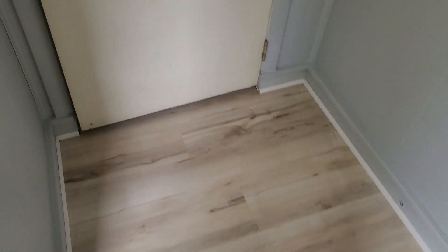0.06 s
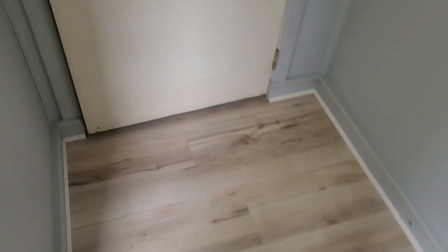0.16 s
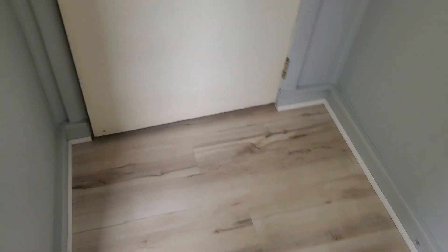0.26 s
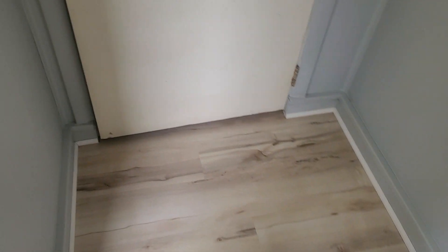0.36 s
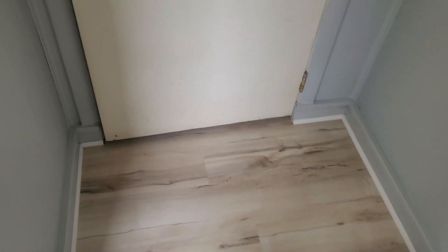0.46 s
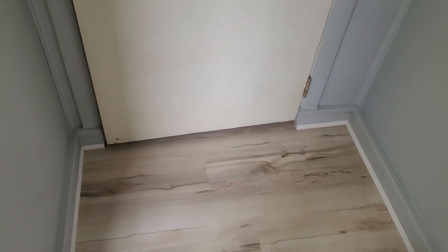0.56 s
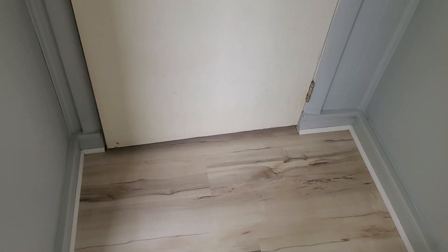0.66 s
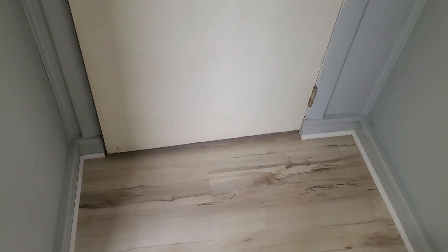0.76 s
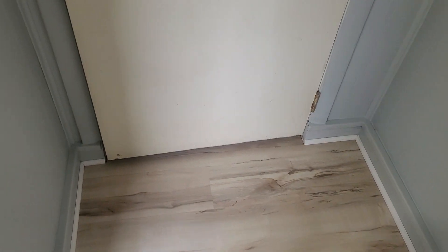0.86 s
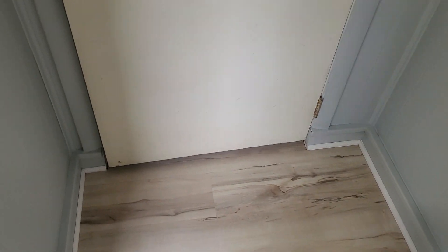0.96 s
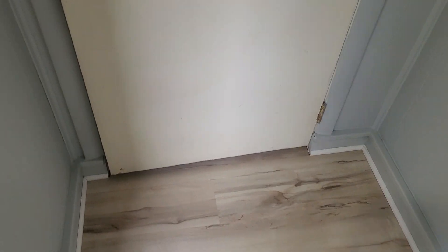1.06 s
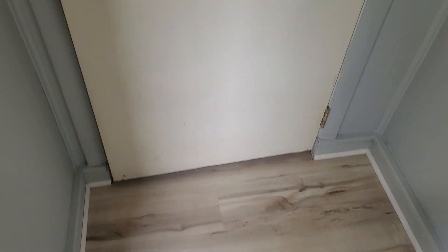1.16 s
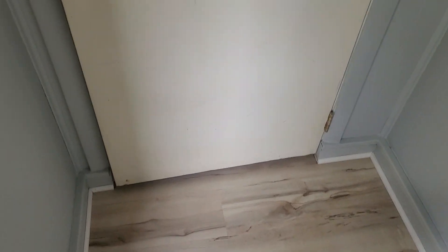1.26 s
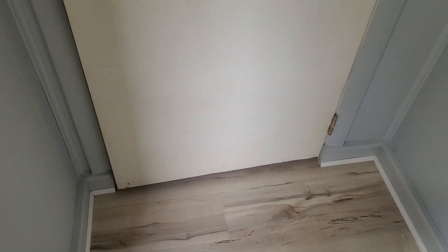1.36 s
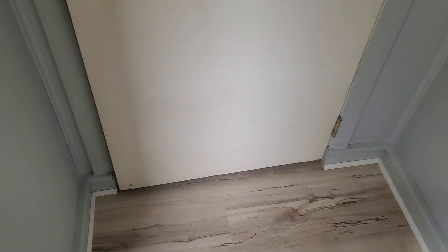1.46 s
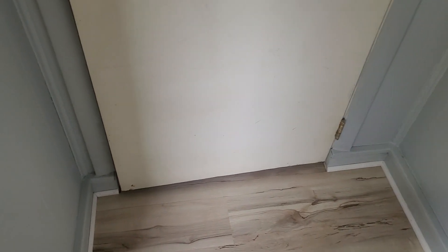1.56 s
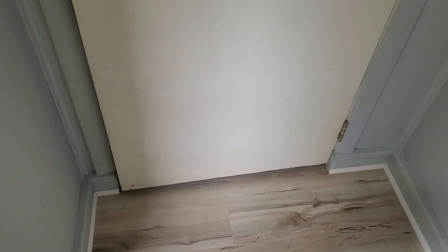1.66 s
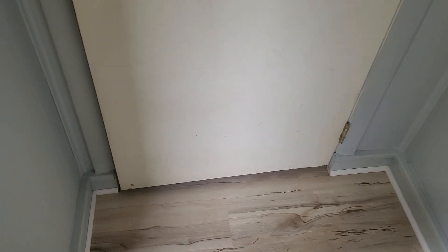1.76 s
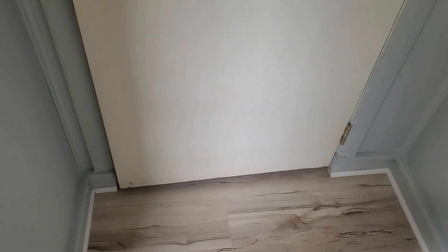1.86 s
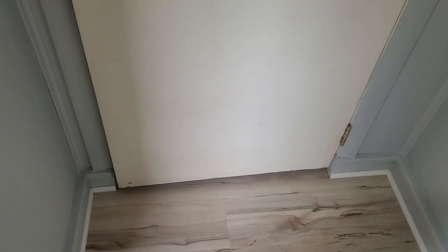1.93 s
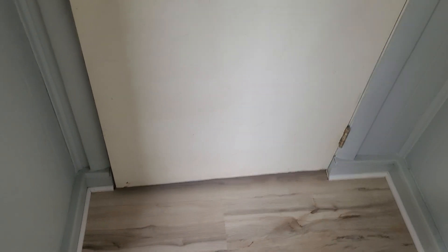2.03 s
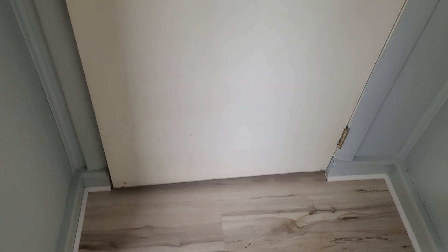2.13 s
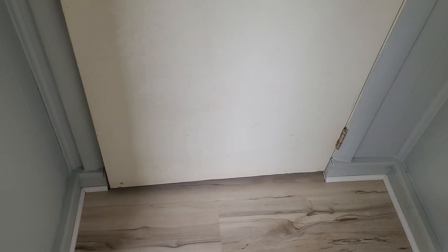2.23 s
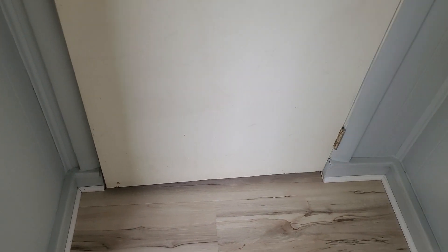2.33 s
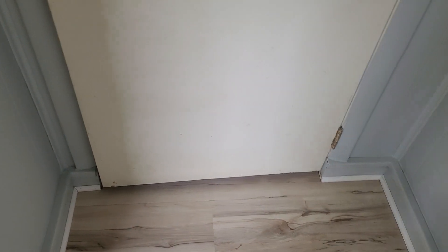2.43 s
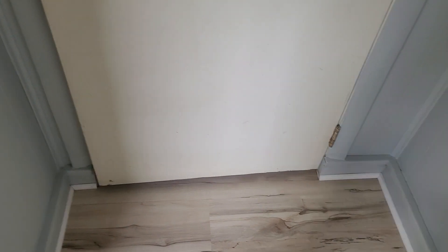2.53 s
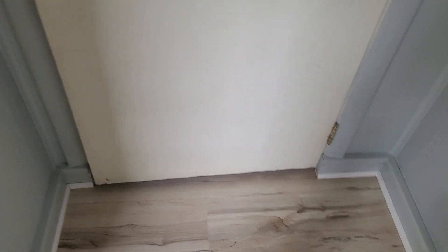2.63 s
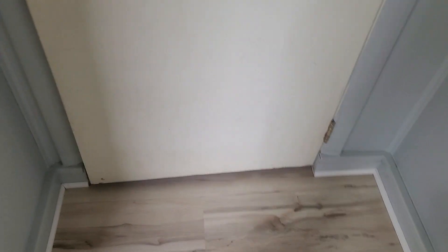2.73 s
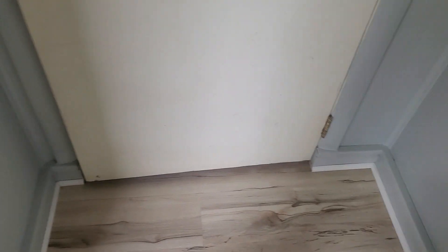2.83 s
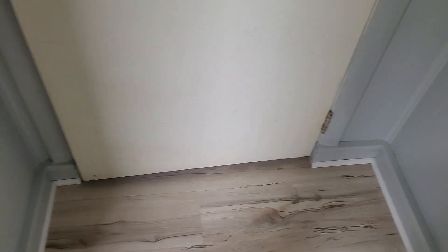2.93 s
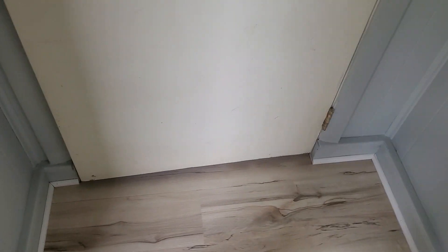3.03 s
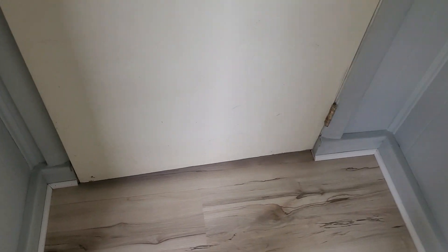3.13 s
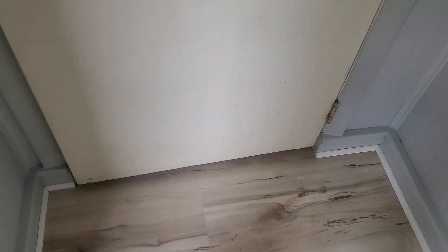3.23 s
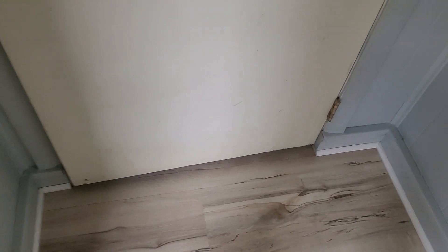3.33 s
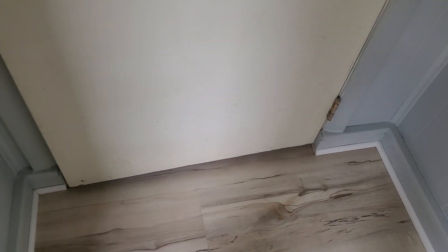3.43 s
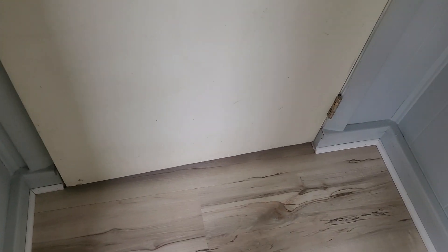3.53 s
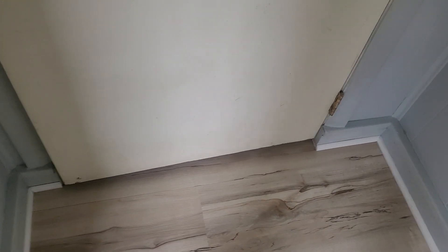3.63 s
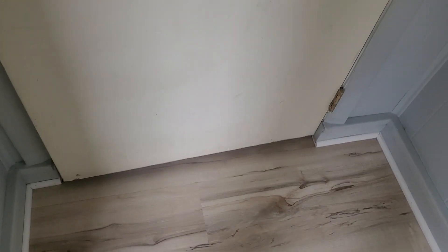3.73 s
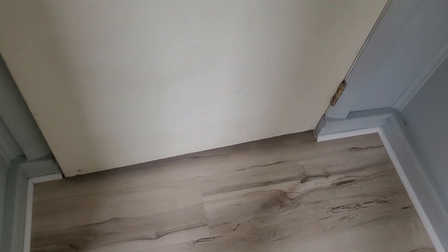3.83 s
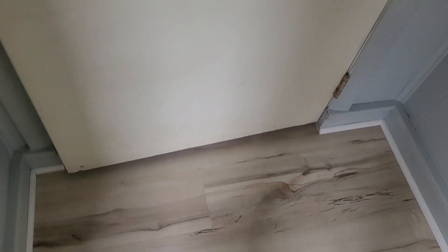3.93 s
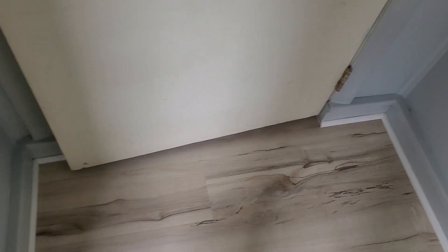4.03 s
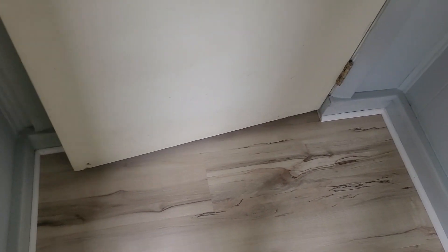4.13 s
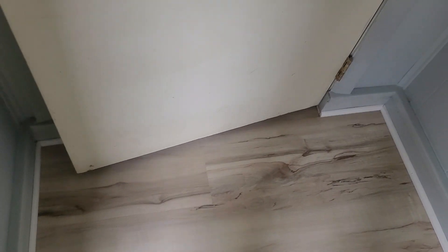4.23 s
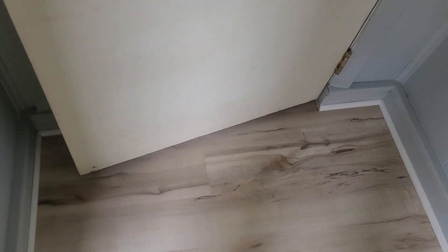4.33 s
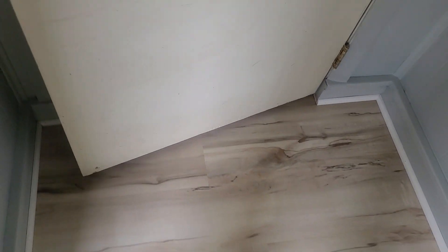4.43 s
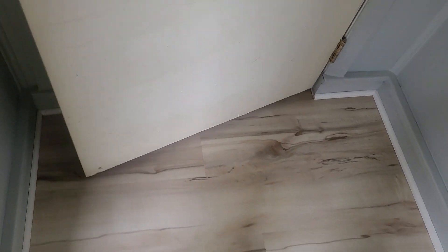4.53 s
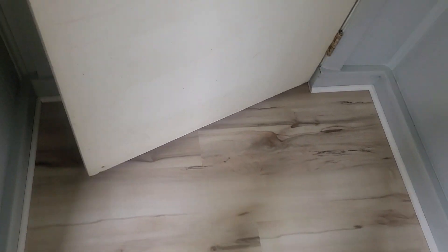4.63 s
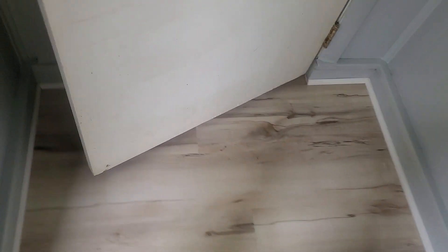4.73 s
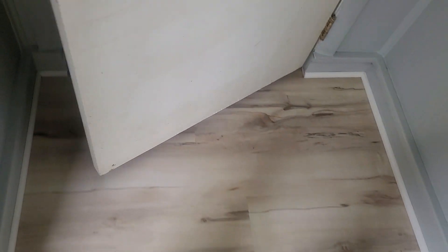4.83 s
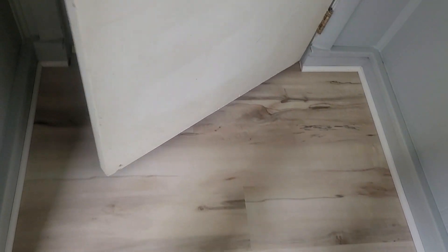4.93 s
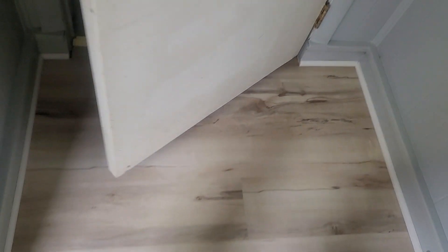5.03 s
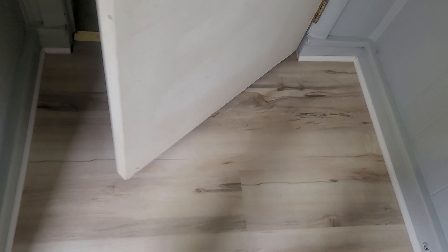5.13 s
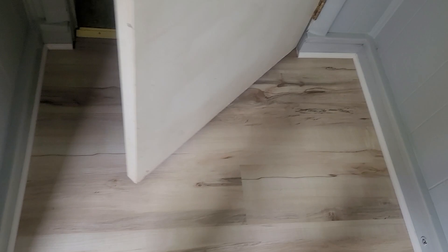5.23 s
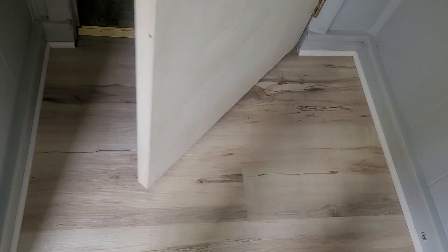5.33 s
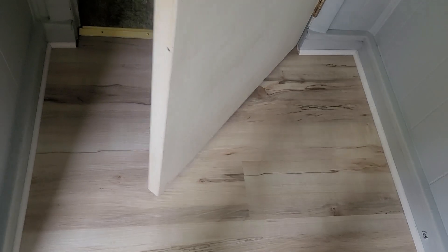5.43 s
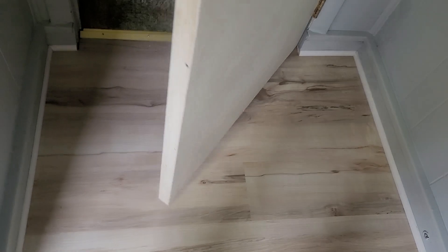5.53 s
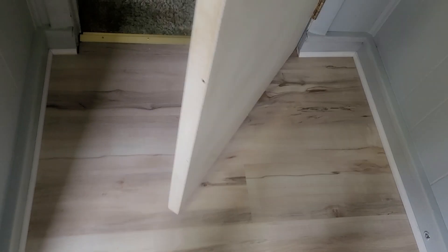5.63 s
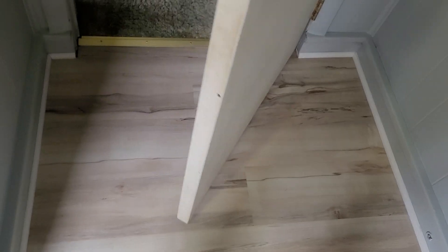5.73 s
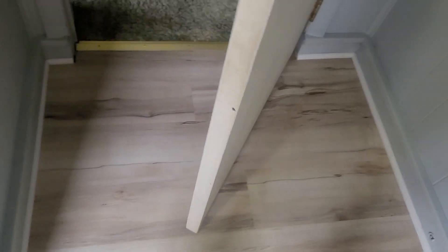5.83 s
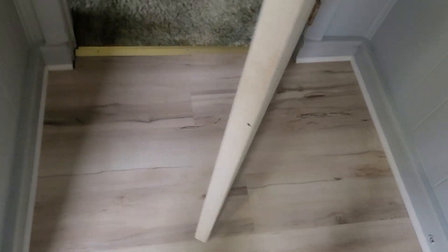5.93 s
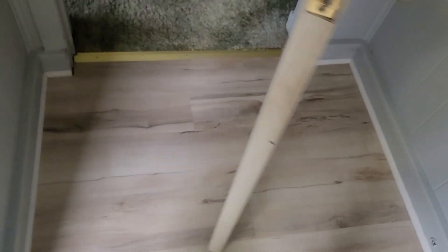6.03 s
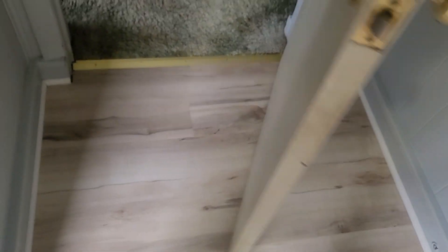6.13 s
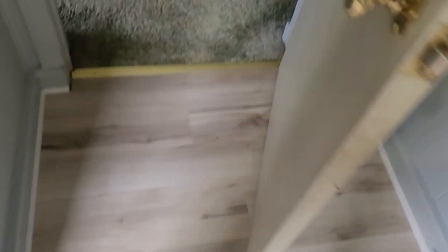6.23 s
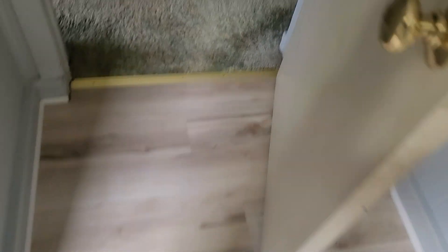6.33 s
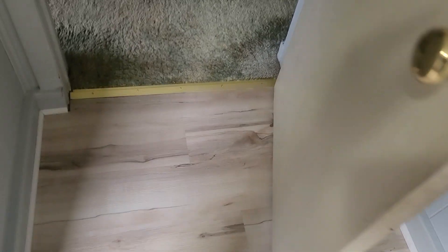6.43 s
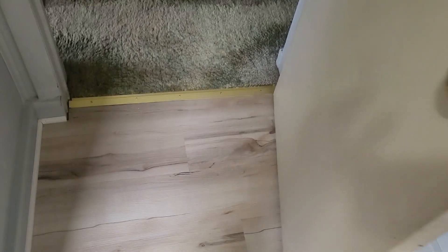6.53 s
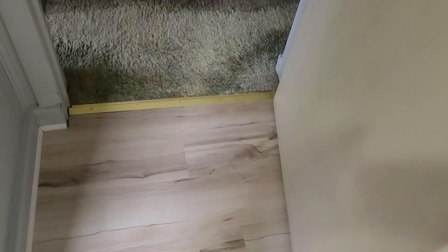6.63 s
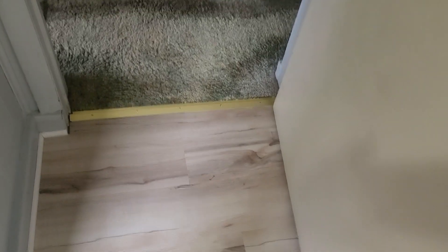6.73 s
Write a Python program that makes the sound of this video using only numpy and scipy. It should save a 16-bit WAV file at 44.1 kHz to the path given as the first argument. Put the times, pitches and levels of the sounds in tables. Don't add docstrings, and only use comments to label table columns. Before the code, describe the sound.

Close stereo pickup indoors: a step and loud shoe scuffs on a hard floor, grit clicking, a few small woody and metallic taps. Midway the door unlatches with a bright crack and low panel resonance, followed by a softer knock, more sole slides, a hard tap and a deep thud. Bare walls echo briefly; steady machine hum, rumble and faint airy hiss remain throughout.

```python
import sys
import numpy as np
from scipy import signal
from scipy.fft import rfft, irfft, next_fast_len
from scipy.io import wavfile
from scipy.ndimage import uniform_filter1d

SR = 44100
rng = np.random.default_rng(int(sys.argv[2]) if len(sys.argv) > 2 else 0)


def waveform_to_disk(signal):
    frames = np.transpose(np.atleast_2d(signal))
    scaled = np.clip(frames, -1, 1) * 32767
    samples = np.round(scaled).astype(np.int16)
    wavfile.write(sys.argv[1], SR, samples)


def how_loud(loudness_db):
    steps = np.asarray(loudness_db, float) / 20
    return 10 ** steps


N = 299086
TIME = np.arange(N) / SR


def unit(x):
    return x / np.sqrt(np.mean(x ** 2))


def on_hz(points, hz):
    table = np.array(points, float)
    return np.interp(np.log(np.maximum(hz, 1)), np.log(table[:, 0]), table[:, 1])


def over_time(points):
    return np.interp(TIME, *np.transpose(points))


def colour(x, points):
    size = next_fast_len(x.shape[-1])
    hz = np.arange(size // 2 + 1) * SR / size
    return irfft(rfft(x, size) * how_loud(on_hz(points, hz)), size)[..., :x.shape[-1]]


def even(x, share, count=128):
    spectrum = rfft(x)
    size = np.abs(spectrum) + 1e-12
    trend = uniform_filter1d(size, size=x.shape[-1] // count)
    return irfft(spectrum * (trend / size) ** share, x.shape[-1])


def walk(rate):
    k = int(SR / rate)
    held = np.repeat(rng.standard_normal(N // k + 1), k)
    return 1.3 * uniform_filter1d(uniform_filter1d(held, k), k)[:N]


def ring(hz, t60, t):
    return np.sin(2 * np.pi * hz * t) * 1000. ** (-t / t60)


def split(db):
    return how_loud(np.array([[db], [-db]]) / 2)


def add(track, s, sound, pan_db=0):
    i = int(s * SR)
    sound = sound[..., :N - i]
    track[:, i:i + sound.shape[-1]] += sound * split(pan_db)


def pair(x, y, split_hz):
    low = signal.sosfilt(signal.butter(2, split_hz, fs=SR, output="sos"), x - y)
    return np.array([x, y + low])


def door():
    # mode frequency in Hz, t60 in seconds, then level in dB in each of the four blows.
    door_modes = [(107, 1, -48, -79, -60, -59), (131, 0.2, -64, -57, -41, -50),
                  (142.5, 0.18, -63, -63, -40.5, -43), (158.5, 0.72, -36, -54.5, -57.5, -51.5),
                  (172.45, 0.43, -26.5, -39.5, -50.5, -33.5), (232.3, 0.33, -51, -53.5, -47, -50),
                  (318, 0.26, -50.5, -42, -44.5, -56.5), (356.6, 0.15, -55, -46, -33.5, -53),
                  (479.6, 0.42, -44.5, -63, -48.5, -65.5), (680, 0.38, -45.5, -53.5, -51.5, -65),
                  (742, 0.47, -47, -59, -58, -67)]
    blows = [
        3.733,
        4.819,
        5.575,
        5.93,
    ]
    # middle in seconds, length in seconds, level in dB.
    pulls = [
        (4.198, 0.23, -66),
        (4.412, .15, -62.5),
        (4.65, .3, -68),
        (5.52, 0.095, -65.5),
    ]
    boom, t = np.zeros((2, N)), TIME[:SR]
    build_up = 1 - np.exp(-t / 0.0097)
    for k, s in enumerate(blows):
        modes = sum(how_loud(db[k]) * ring(hz, t60, t) for hz, t60, *db in door_modes)
        add(boom, s, modes * build_up)
    main_mode = [(120, -55), (160, -13), (175, 2), (190, -1.0), (260, -80)]
    drone = unit(colour(rng.standard_normal(N), main_mode))
    return boom + drone * sum(swell(s, length) * how_loud(db) for s, length, db in pulls)


def knocks():
    # crack at 1.25 kHz, edge at 3.3
    # kHz, metal tick at 7 kHz. First light taps, then knocks on the door.
    taps = [
        (1.888, -46, 8.5, -9.5, -16.5),
        (2.166, -48, -4, -32, -24),
        (2.556, -54, -0.5, -5, 7),
        (3.187, -50, -4, -13.5, -18.5),
        (5.577, -29.5, -2, -19.5, -36.5),
    ]
    door_knocks = [
        (2.868, -64, -1, -9, -9),
        (3.732, -27, -4, -11, -18.5),
        (4.819, -39, -0.5, -6, -14.5),
        (5.109, -54.5, 5, -9, -19),
        (5.916, -53, -6.5, -26.5, -22.5),
    ]
    # time in seconds, left minus right in dB.
    swing = [(1.9, -2.5), (3.2, -10), (4.8, -6), (5.9, -14.5)]
    track, lead = np.zeros((2, N)), 256 / SR
    t = np.maximum(TIME[:4096] - lead, 0)
    fade_in = np.minimum(TIME[:4096] / lead, 1) ** 4
    # table, rattle s, echo dB, wood dB, shine dB near 5 kHz (the latch plate brightens door knocks)
    for table, rattle, wet_db, wood_db, shine_db in ((taps, .0026, 4.5, -4, -5),
                                                     (door_knocks, .008, 5.5, 0, 1.5)):
        for s, db, crack, edge, tick in table:
            wood = -0.5 + wood_db - 0.53 * (db + 43) + 0.13 * crack
            pan_db = np.interp(s, *np.transpose(swing))
            envelope = np.exp(-t / rattle) * (1 - np.exp(-t / (.35 * rattle)))
            jolts = rng.standard_normal(len(t)) * envelope
            plate = (edge + tick) / 2
            shape = [(150, wood - 20), (400, wood), (800, wood - 3), (1250, crack), (1750, 0.69),
                     (2500, edge * 0.38), (3400, edge), (4300, plate), (5200, plate + shine_db), (6000, tick),
                     (6800, tick), (8200, tick - 10), (14000, tick - 14), (16000, tick - 30)]
            jolts = even(jolts, .8, count=24) / np.sqrt(np.sum(jolts ** 2))
            hit = how_loud(db + 34.5) * colour(jolts, shape) * fade_in
            echo = signal.fftconvolve(hit[None], room(), axes=1)
            add(track, s - lead, how_loud(wet_db) * echo, pan_db / 2)
            add(track, s - lead, hit, pan_db)
    return track


def latch():
    # frequency in Hz, level in dB, t60 in seconds.
    latch_modes = [(1631, -17, 0.2), (1815, 13, 0.29), (2470, -13, 0.16), (2930, -20, 0.59),
                   (3030, -11, 0.28), (4339, -36, 1.3), (5240, -10, 0.1), (5674, -22, 0.25)]
    # time in seconds, level in dB.
    latch_hits = [
        (3.735, -47),
        (4.821, -55.5),
    ]
    track, t = np.zeros((2, N)), TIME[:SR // 2]
    build_up = 1 - np.exp(-t / 0.0022)
    for s, hit_db in latch_hits:
        chances = rng.standard_normal((len(latch_modes), 2))
        for (hz, db, t60), (size, side) in zip(latch_modes, chances):
            tone = ring(hz, min(t60, .4), t) * build_up
            add(track, s, how_loud(hit_db + db + 1.3 * size) * tone, 6.0 * side - 6)
    return track


def swell(s, length):
    return how_loud(-10 * np.minimum((2 * (TIME - s) / length) ** 2, 30))


def drag(s, length):
    edge_s, sag_db = 0.0055, -3.5
    release = 2 * edge_s + (s + length - TIME) / 2
    edge = np.clip(np.minimum(TIME - s, release) / edge_s, 0, 1)
    return edge ** 2 * how_loud(sag_db * np.clip((TIME - s) / length, 0, 2))


def scuffs():
    # start in seconds, length in seconds, level in dB,
    # hiss above 4 kHz in dB against that.
    drags = [
        (0.0, 0.017, -49.5, -5),
        (0.054, 0.092, -64, -6.5),
        (0.7, 0.044, -42, -6.5),
        (2.505, 0.044, -63, 1.5),
        (5.1, 0.048, -58.5, -7),
        (5.344, 0.099, -50, -2.5),
        (5.671, 0.024, -58, -1.5),
    ]
    # middle in seconds, length in seconds, level in dB, hiss in dB against that.
    brushes = [(0.348, 0.11, -65.5, -2), (0.473, 0.056, -66.5, 4.5), (0.788, .1, -35.5, -3),
               (0.889, 0.11, -55, 1.5), (0.933, 0.095, -62, -12.5), (1.31, 0.089, -63.5, 6.5),
               (1.67, 0.063, -44.5, -5), (1.734, 0.13, -72, 5), (2.054, 0.067, -82.5, 11),
               (2.16, .06, -73, -4.5), (2.376, 0.3, -71.5, -6.5), (2.85, 0.35, -70, -6),
               (3.11, 0.33, -80.5, -3), (3.36, 0.43, -71.5, -7.5), (3.685, 0.11, -65.5, -2.5),
               (4.236, 0.066, -71, -12), (4.397, 0.1, -79, -19), (5.048, 0.042, -64, -1),
               (5.144, 0.091, -69.5, 6), (5.82, 0.088, -75, -18), (6.143, 0.08, -68.5, 4)]
    # middle in seconds, length in seconds, level in dB.
    groans = [(0.05, 0.083, -59.5), (.36, 0.064, -69), (.79, 0.098, -69), (.96, 0.071, -58.5),
              (1.678, 0.086, -66.5), (4.214, 0.11, -64.5), (4.368, 0.19, -63.5), (4.712, 0.13, -70.5),
              (5.719, 0.083, -63)]
    # frequency in Hz, dB per Hz.
    sole_tone = [(470, -36), (800, -19.5), (1290, -8), (1360, -1), (1470, -4), (1740, 1.5), (1880, -3),
                 (3100, -5), (4200, -11), (5460, -44), (9240, -120)]
    hiss_tone = [(2240, -6), (3800, -6), (4180, -5), (6260, -2), (7170, -2), (7750, -10.5), (9590, -14),
                 (13300, -18), (15700, -22)]
    boards = [(100, -43.0), (200, -7.5), (400, 1.5), (750, 4.5), (1100, -6), (2000, -47)]
    fizz = [(6000, -26), (9000, -3), (14500, -8), (16000, -29)]
    bite = [(1500, -21), (2200, -3), (3100, -4), (4200, -24)]
    tones = (sole_tone, hiss_tone, boards, fizz, bite)
    drive = np.zeros((5, N))
    for shape, table, bite_db in ((drag, drags, -10), (swell, brushes, -30)):
        for s, length, db, hiss_db in table:
            fizz_db = -12.5 + 1.66 * hiss_db
            parts_db = np.array([[0], [hiss_db], [-30.5], [fizz_db], [bite_db]])
            drive += shape(s, length) * how_loud(db + parts_db)
    drive[2] += sum(swell(s, length) * how_loud(db) for s, length, db in groans)
    size_db = 2.0 * np.minimum(rng.exponential(size=N), 4) + 1.0 * walk(70)
    grains = rng.standard_normal((5, N)) * how_loud(size_db)
    return sum(d * unit(colour(g, tone)) for d, g, tone in zip(drive, grains, tones))


def grit():
    # time in seconds, level in dB, ring frequency in Hz, left minus right in dB.
    ticks = [(.544, -48, 1300, 7), (.99, -67, 10600, 0), (1.362, -52, 2500, 4), (0.911, -30.5, 1800, -1),
             (1.064, -58, 3040, 6), (1.08, -48.5, 2840, 17), (1.103, -50.5, 2010, 18),
             (1.119, -44, 2040, 14), (1.138, -42.5, 2640, 15), (1.2091, -50, 3450, 30),
             (1.844, -56, 6140, 0), (2.12, -73, 4015, -7), (2.485, -48.5, 7000, -3), (2.511, -53, 7023, -1),
             (4.249, -66, 1801, -8), (4.91, -56, 1853, -9), (5.044, -46, 1930, -12), (5.826, -63, 4290, -3)]
    track, t = np.zeros((2, N)), TIME[:400]
    snap = how_loud(-24.0) * ring(7000, 0.00054, t)
    for s, db, hz, pan_db in ticks:
        body = ring(hz, 2.52 / hz, t) * (1 - np.exp(-t * hz))
        add(track, s, how_loud(db + 19.0) * (body + snap), pan_db)
    return signal.sosfilt(signal.butter(2, 500, "high", fs=SR, output="sos"), track)


def heels():
    # time in seconds, level in dB, frequency in Hz, t60 in seconds.
    heel_falls = [(0.049, -40, 243, 0.04), (0.071, -50.5, 393, 0.11), (.54, -56, 500, 0.011),
                  (0.947, -39, 352, 0.03), (.96, -47, 230, 0.084), (0.975, -48.5, 137, 0.05),
                  (1.361, -51, 510, 0.018), (1.751, -63, 400, 0.015), (1.769, -47, 414, 0.0086),
                  (1.899, -66, 424, 0.13), (1.958, -46, 200, 0.013), (2.0652, -39.5, 194, 0.017),
                  (5.913, -30, 149, 0.096), (6.201, -52.5, 267.4, 0.037), (2.556, -58.5, 191, 0.067),
                  (3.2, -54, 465, 0.13), (3.188, -58, 175, 0.11), (4.705, -58, 706, 0.078),
                  (4.741, -58, 746, 0.042), (4.775, -57, 760, 0.046)]
    track, t = np.zeros((2, N)), TIME[:8000]
    for s, db, hz, t60 in heel_falls:
        add(track, s, how_loud(db + 0.5) * ring(hz, t60, t) * (1 - np.exp(-t * hz * 3.2)), -2.0)
    return track


def room():
    # frequency in Hz, t60 in seconds.
    decay = [(100, 0.62), (500, 0.42), (1500, 0.25), (4000, 0.35), (8000, 0.24), (15000, 0.12)]
    t = TIME[:16384]
    sparse = rng.random((2, len(t))) < .02 + (t / .02) ** 2
    thickness = np.sqrt(np.clip(0.011 + (t / 0.024) ** 2, 0, 1))
    echoes = pair(*(rng.standard_normal((2, len(t))) * sparse * (t > .002) / thickness), 132)
    tail = 0
    for hz in 100 * 2. ** np.arange(8):
        band = [(hz / 2.01, -90), (hz / 2, -30), (hz / 1.4, -6), (hz, 0),
                (hz * 1.4, -6), (hz * 2, -30), (hz * 2.01, -90)]
        tail = tail + colour(echoes, band) * 1000. ** (-t / on_hz(decay, hz))
    tail = even(even(tail, .6), .7, count=24) * np.clip(3 - t / .1, 0, 1) ** 2
    return how_loud(-1) * tail / np.sqrt(np.sum(tail ** 2) / 2)


def machine_hum():
    # time in seconds, level in dB.
    hum_level = [(0, -55.5), (.4, -55.5), (.65, -52), (1.1, -53.5), (1.5, -47.5), (1.8, -48.5), (2.15, -47),
                 (2.3, -52.5), (2.75, -48.5), (3.1, -49.5), (3.6, -47), (4.1, -49), (4.6, -46),
                 (4.95, -50.5), (5.4, -50.5), (5.95, -48.5), (6.2, -48), (6.6, -46.5), (6.78, -52)]
    # frequency in Hz, start in seconds, end in seconds, level in dB.
    motor = [
        (115.5, -3, 2.46, -75.5),
        (178.5, 3.5, 8, -77),
    ]
    hum = np.sqrt(2) * how_loud(over_time(hum_level) + walk(9)) * np.sin(2 * np.pi * 59.9 * TIME)
    for hz, on, off, db in motor:
        gate = np.clip(np.minimum(TIME - on, off - TIME) * 10, 0, 1)
        hum += how_loud(db + 2 * walk(4.05)) * np.sin(2 * np.pi * hz * TIME) * gate
    return hum


def rumble():
    # frequency in Hz, dB per Hz.
    rumble_tone = [(18, -27), (28, -9), (40, -2), (50, -6), (70, -8.5), (82, -9), (95, -26)]
    return how_loud(-55.5) * unit(colour(rng.standard_normal(N), rumble_tone + [(120, -78)]))


def room_air():
    # frequency in Hz, dB per Hz.
    air_tone = [(95, -13), (125, -26), (200, -20.5), (250, -24.5), (500, -29.5), (900, -30.5), (1500, -29),
                (1900, -28), (2600, -35), (4600, -44), (6800, -45.5), (8500, -45.5), (9500, -58.5),
                (15700, -54)]
    # time in seconds, level in dB.
    air_level = [(0, 0.5), (2.2, -0.5), (3.4, .5), (4.2, 0), (6.78, -1.5)]
    air = colour(pair(*rng.standard_normal((2, N)), 675), [(60, -39.5)] + air_tone)
    drift = how_loud(.6 * walk(3) + over_time(air_level))
    return how_loud(-65) * drift * unit(air) * split(-1.2)


def duct():
    hz = 1824
    peak = [(hz * 0.98, -40), (hz * .98, -6), (hz, 0), (hz * 1.02, -6), (hz * 1.1, -40)]
    return how_loud(-79.5) * unit(colour(rng.standard_normal((2, N)), peak))


def whine():
    # time in seconds, level in dB.
    whine_level = [(0, -87), (.6, -82), (1.5, -86), (2.4, -87), (2.8, -91), (6.78, -89)]
    return how_loud(over_time(whine_level) + 2.5 * walk(8)) * np.sin(2 * np.pi * 7994 * TIME)


def background():
    low = (machine_hum() + rumble()) * split(-1.7)
    return low + duct() + room_air() + whine()


def scene():
    # time in seconds, left minus right in dB.
    feet_side = [(0, -1.5), (1, -1.5), (1.5, -0.5), (2.5, 0.5), (4, 0), (5.2, -5), (6.78, -2)]
    feet, close = scuffs(), grit() + heels()
    source = feet + how_loud(-8) * close.mean(axis=0)
    wet = signal.fftconvolve(source[None], room(), axes=1)[:, :N]
    near = how_loud(np.array([[-6.0], [-5.0]])) * np.array([feet, np.roll(feet, 7)]) + wet
    pan_db = uniform_filter1d(over_time(feet_side), size=2000)
    sides = how_loud(np.array([[.5], [-.5]]) * pan_db)
    return sides * near + close + knocks() + door() + latch() + background()


def roll_off(x):
    return signal.sosfilt(signal.butter(12, 15850, fs=SR, output="sos"), x)


def record(dry):
    vent = signal.butter(1, 19, "high", fs=SR, output="sos")
    left = signal.sosfilt(vent, dry[0])
    return roll_off(np.array([left, dry[1]]))


dry = scene()
out = record(dry)
waveform_to_disk(out)
```